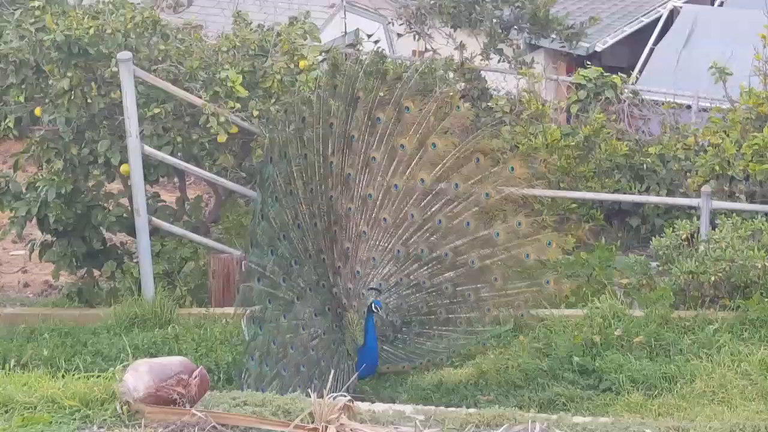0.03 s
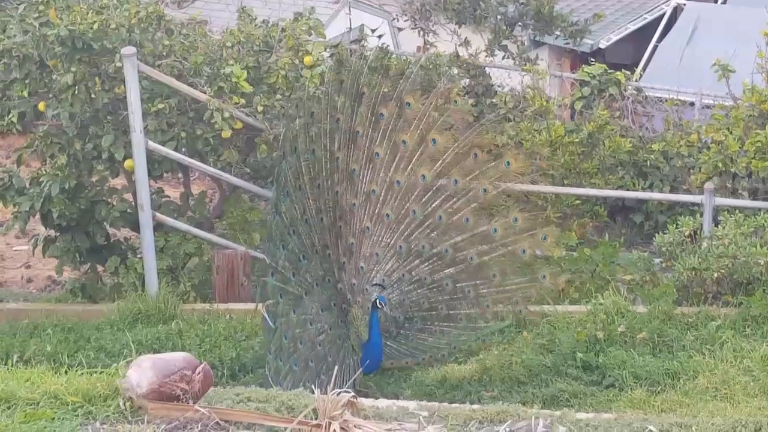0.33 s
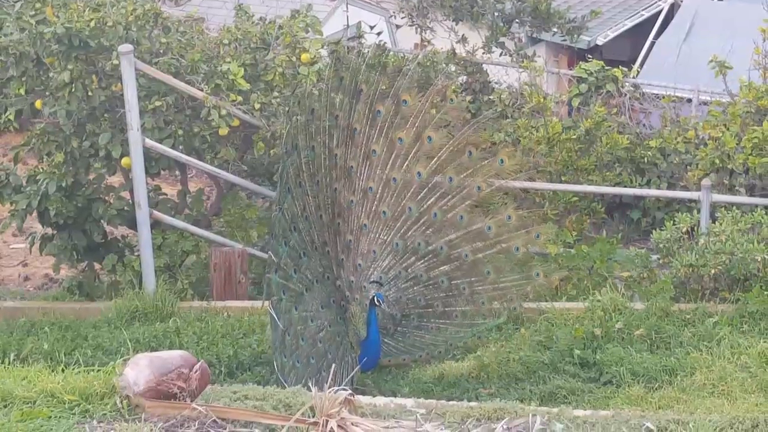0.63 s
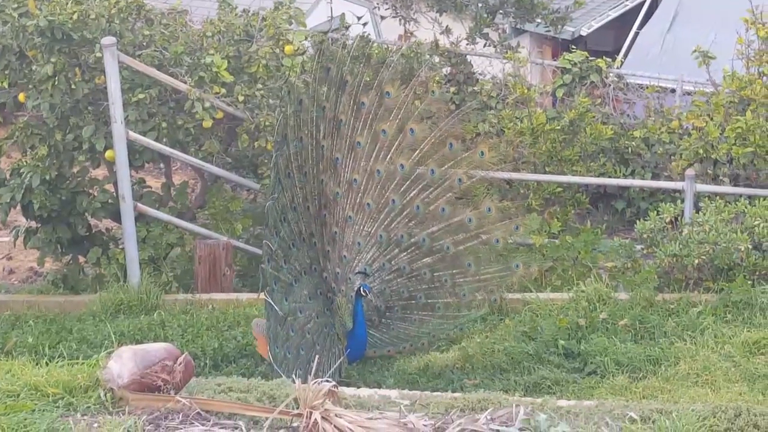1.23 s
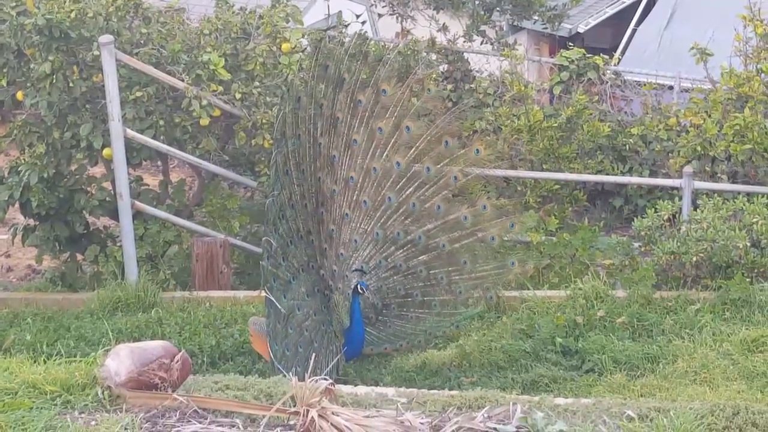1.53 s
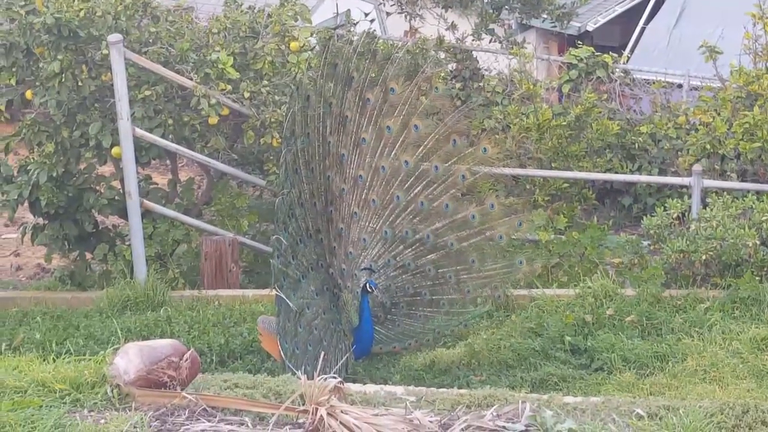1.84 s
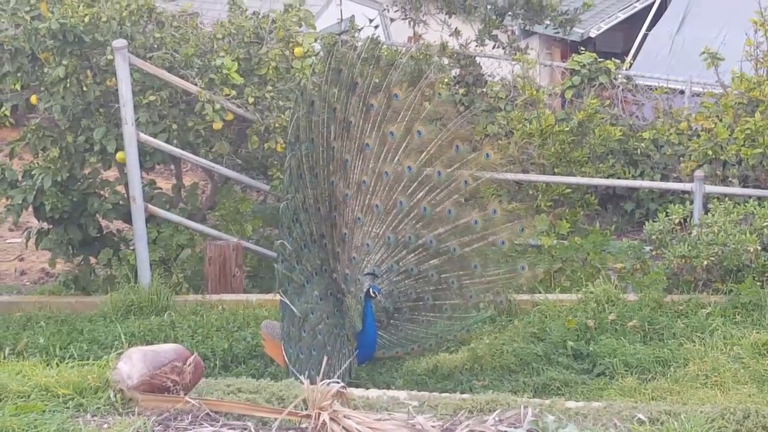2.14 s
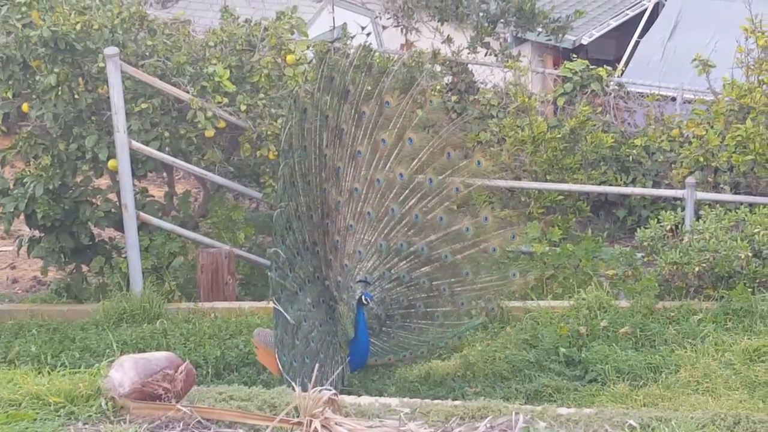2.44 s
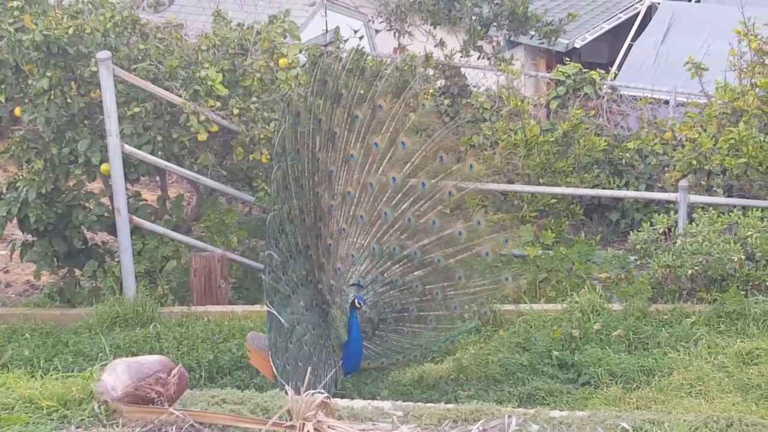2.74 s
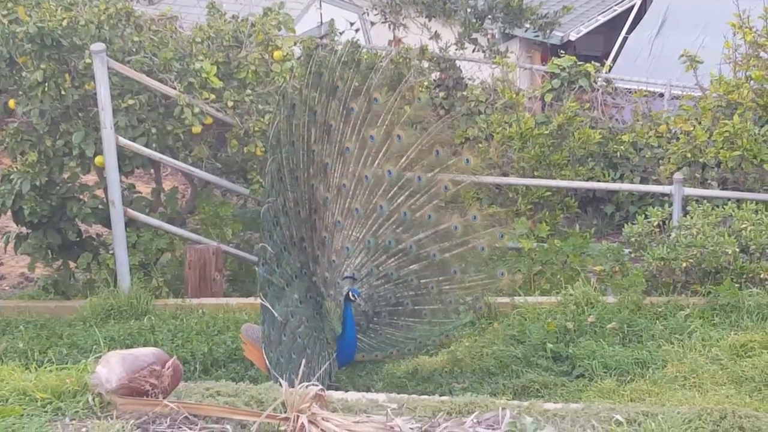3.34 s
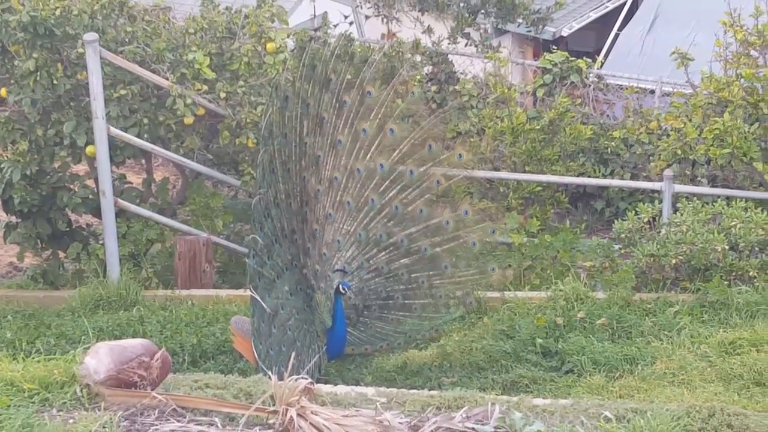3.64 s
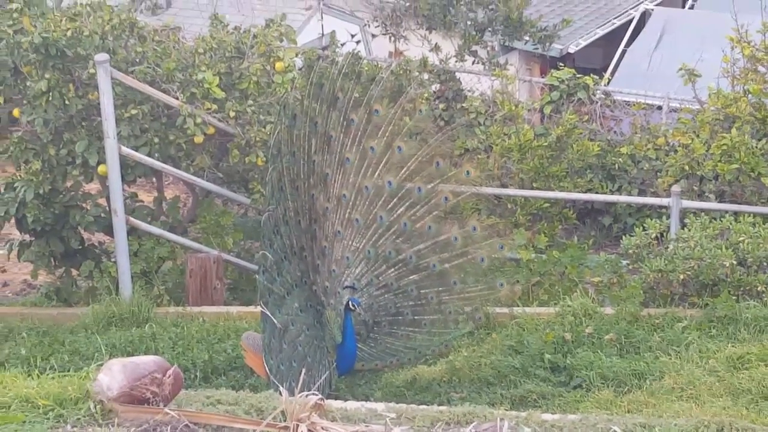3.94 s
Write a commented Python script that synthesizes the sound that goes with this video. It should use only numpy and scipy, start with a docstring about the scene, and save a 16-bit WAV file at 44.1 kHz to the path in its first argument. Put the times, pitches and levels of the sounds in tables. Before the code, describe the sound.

A small songbird chirps over the steady low rumble of distant traffic in a garden.

```python
"""A garden, heard in stereo under the steady low rumble of distant traffic.
A small songbird whistles in the bushes right of the microphone; a second answers from farther off, left.
A displaying peacock rubs and ticks its feathers and scrapes a step through dry grass. Leaves rustle,
a far engine drones, and a faint hiss lies behind it all. The sound fades up in the first second."""
import sys
import numpy as np
from scipy import signal
from scipy.fft import rfft, irfft
from scipy.io import wavfile

SR = 44100
rng = np.random.default_rng(int(sys.argv[2]) if len(sys.argv) > 2 else 0)


def bounce(signal):
    """Save signal as a 16-bit WAV file at the path given by the first command-line argument."""
    frames = np.transpose(np.atleast_2d(signal))
    limited = np.clip(frames, -1, 1)
    pcm = np.round(limited * 32767).astype(np.int16)
    wavfile.write(sys.argv[1], SR, pcm)


N = 176400
T = np.arange(N) / SR
FREQS = np.maximum(np.arange(N // 2 + 1) * SR / N, 1)


def songbirds():
    """Two birds, the nearer on the right and the farther on the left with more of the garden's echo."""
    # the near bird's notes: start_s, length_s, first_hz, middle_hz, last_hz, level_db
    song = [ (.378, .075, 5200, 4530, 3250, -61), (.480, .036, 3300, 2970, 2350, -58.5),
            (.510, .040, 4460, 3900, 3750, -64), (.560, .057, 3650, 3300, 3050, -65),
            (.635, .085, 3150, 3330, 3560, -64), (.660, .054, 4260, 3960, 4180, -58.5),
            (.712, .062, 3600, 3280, 3550, -61), (.803, .056, 4130, 3950, 4080, -57.5),
            (.858, .048, 3730, 3220, 3050, -65.5), (.958, .060, 3230, 3000, 2200, -63.5),
            (1.140, .044, 3150, 2700, 2150, -63), (1.285, .042, 2750, 3150, 3250, -67),
            (1.345, .078, 2320, 3880, 2310, -58.5), (1.522, .046, 3186, 2800, 2300, -64),
            (1.675, .046, 3700, 3050, 2200, -65), (1.818, .042, 2550, 3000, 3250, -67.5),
            (1.900, .072, 2900, 4040, 2700, -59), (2.775, .040, 3050, 3280, 3330, -69)]
    # the far bird's notes, same columns
    answer = [ (3.040, 0.05, 3990, 3830, 3800, -72), (3.210, .065, 3850, 4420, 4200, -76),
              (3.345, .06, 4060, 4000, 3750, -76), (3.480, .04, 4390, 4500, 4480, -78),
              (3.568, 0.034, 3870, 3740, 3840, -67.5), (3.645, 0.081, 4000, 4250, 3620, -71),
              (3.772, 0.067, 3505, 3920, 3220, -69.5), (3.845, 0.0535, 3770, 4120, 4280, -72.5),
              (3.890, .035, 3750, 3450, 3180, -71), (3.920, .082, 4150, 4050, 3390, -72)]
    return (whistles(song, pan_db=-4, right_lag_s=-0.00018, echo_db=-0.5)
            + whistles(answer, pan_db=8, right_lag_s=0.00019, echo_db=2))


def whistles(notes, pan_db, right_lag_s, echo_db):
    """A bird's notes bend through three pitches, clear when held and husky in fast slurs."""
    rasp, slur_rasp_s, edge_s, flutter_db = .016, .0018, .01, 2
    jitter, voice = walk(500), np.zeros(N)
    for start, length, first, middle, last, db in notes:
        on = (T >= start) & (T < start + length)
        progress = (T[on] - start) / length
        hz = np.polyval(np.polyfit([0, .5, 1], [first, middle, last], 2), progress)
        slur_per_s = abs(np.gradient(hz)) * SR / hz
        hz = hz * (1 + (rasp + slur_rasp_s * slur_per_s) * jitter[on])
        edge = np.clip(np.minimum(progress, 1 - progress) * length / edge_s, 0, 1)
        voice[on] += undb(db) * np.sin(np.pi / 2 * edge) * np.sin(2 * np.pi * np.cumsum(hz) / SR)
    voice = voice * undb(flutter_db * walk(150))
    direct = np.array([voice, np.interp(T - right_lag_s, T, voice)])
    return pan(pan_db) * direct + undb(echo_db) * garden_echo(voice)


def peacock():
    """Right of the microphone, feathers swish, the train is shaken and quills tick."""
    # feather swishes: peak_s, rise_s, fall_s, level_db, pan_db
    swishes = [(1.07, .05, 0.04, -75.5, -18.5), (1.365, 0.046, 0.014, -73.5, -11),
               (1.88, .04, 0.052, -77, -8)]
    # shakes of the train, same columns
    shakes = [(2.648, 0.033, 0.029, -60.5, -9), (2.699, .03, .018, -58.5, -1),
              (2.78, 0.051, .025, -73.5, -12)]
    # quill ticks: peak_s, fall_s, level_db, pan_db
    quills = [(1.379, .005, -65, -9), (1.785, .015, -63, -11.5), (1.894, .005, -69, -9),
              (1.965, .005, -66, -6), (2.129, .0089, -61, -5), (2.394, .011, -66.5, -2),
              (2.645, .006, -60, 0), (2.698, 0.0056, -64, -3), (3.772, .004, -66, -6)]
    # spectra of swish, shake and tick: frequency_hz, level_db
    swish_colour = [(2000, -25), (4500, -6), (6200, -17), (7600, -1), (8400, -12), (9500, -21),
                    (15000, -16)]
    shake_colour = [(1500, -1), (3000, 2), (4300, -3), (5000, 5), (6500, 0), (8000, 7), (9700, -14),
                    (12000, -7), (14000, -3), (15500, -1.5)]
    quill_colour = [(1500, -8), (3500, 1), (5200, 4.5), (6500, -5), (8000, 7), (9200, -17), (11500, -11),
                    (15000, -7)]
    tick_rise_s = 0.0016
    ticks = [(peak, tick_rise_s, fall, db, pan_db) for peak, fall, db, pan_db in quills]
    return friction(swishes, swish_colour) + friction(shakes, shake_colour) + friction(ticks, quill_colour)


def grass_step():
    """A step scrapes through dry grass on the right."""
    # scrapes: peak_s, rise_s, fall_s, level_db, pan_db
    scrapes = [(2.056, 0.013, 0.031, -64, -5), (2.23, 0.12, 0.035, -76, -7)]
    # spectrum of dry grass: frequency_hz, level_db
    scrape_colour = [(3500, -9), (4900, -7.5), (5800, -15)]
    return friction(scrapes, scrape_colour)


def bushes():
    """Leaves rub together in two soft, centred swells."""
    # rustles: peak_s, rise_s, fall_s, level_db, pan_db
    rustles = [(1.4, 0.57, 0.62, -72, 0), (3.87, 0.091, 0.48, -66.5, 0)]
    # spectrum of the leaves: frequency_hz, level_db
    rustle_colour = [(1500, -3), (2300, 5.5), (3200, -1.5), (4800, -4.5), (6200, -14), (8000, -7),
                     (9200, -8), (11000, -20)]
    return friction(rustles, rustle_colour)


def friction(strokes, spectrum):
    """Grainy rubbing of feathers, leaves or grass; each stroke swells to a peak and dies away."""
    grain_db, echo_db = 2.5, -2.5
    envelope = 0
    for peak, rise, fall, db, pan_db in strokes:
        swell = np.exp(np.minimum((T - peak) / rise, (peak - T) / fall))
        envelope = envelope + pan(pan_db) * undb(db) * swell
    grain = unit(undb(grain_db * walk(180)))
    rub = envelope * grain * np.array([noise(colour(spectrum)) for _ in range(2)])
    return rub + undb(echo_db) * garden_echo(rub.mean(axis=0))


def traffic():
    """Far road noise: each octave band flickers a little; the bass is alike in both channels."""
    # rumble common to both channels: frequency_hz, level_db
    mid_colour = [(18, -29), (31, -20.5), (40, -5), (54, -5), (70, -2.5), (88, -1.5), (115, -1.5),
                  (150, -6.5), (178, -6), (196, -8.5), (228, -9), (310, -13), (420, -22), (720, -20),
                  (1060, -28), (1500, -31), (2500, -39.5)]
    # rumble that differs between them, same columns
    side_colour = [(15, -45), (25, -11.5), (69, -6), (87, 5), (161, -4.5), (200, 0), (489, -7),
                   (1020, -5.5), (1480, -8), (2600, -19), (3380, -43), (5720, -120)]
    # the road's left-right balance: frequency_hz, pan_db
    balance = [(60, 1.0), (250, 0.8), (600, -1), (1300, -1.5), (2300, -4)]
    mid = undb(-43.8) * noise(colour(mid_colour))
    side = undb(-58.1) * noise(colour(side_colour))
    hz, db = np.array(balance).T
    pan_db = np.interp(np.log(FREQS), np.log(hz), db)
    spectrum = rfft(np.array([mid + side, mid - side])) * pan(pan_db)
    flicker_db, rumble = 0.74, 0
    for octave in range(3, 15):
        band = np.maximum(1 - abs(np.log2(FREQS) - octave), 0)
        rumble = rumble + irfft(spectrum * band, N) * undb(flicker_db * walk(6.8))
    return rumble


def engine_drone():
    """A far engine's unsteady firing note swells within the rumble."""
    # the engine's swells: time_s, level_db
    swells = [(.6, -62), (1.2, -50), (2.0, -54.5), (2.5, -45), (3.4, -54), (3.9, -79)]
    firing_hz, wander_hz, waver_db = 82.7, 4.42, 2
    hz = firing_hz + wander_hz * walk(7.96)
    return np.sin(2 * np.pi * np.cumsum(hz) / SR) * undb(curve(swells) + waver_db * walk(8.9))


def hiss():
    """Smooth faint hiss, unrelated between the channels."""
    # spectrum of the hiss: frequency_hz, level_db
    hiss_colour = [(1800, -9.5), (2700, 2.5), (4000, 0.5), (5200, -3.5), (6400, -7), (7800, -6.5),
                   (9000, -12), (10500, -12), (13000, -6), (15500, -6)]
    return undb(-69) * np.array([noise(colour(hiss_colour)) for _ in range(2)])


def garden_echo(x):
    """Quick scatter from nearby bushes and a longer tail from fences and house walls, in stereo."""
    scatter_t60_s, tail_t60_s, tail_db = 0.066, 0.99, -9
    t = T[:SR]
    decay = undb(-60 * t / scatter_t60_s) + undb(tail_db - 60 * t / tail_t60_s)
    response = rng.standard_normal((2, SR)) * decay
    response /= np.sqrt(np.sum(response ** 2, axis=1, keepdims=True))
    return signal.fftconvolve(x[None], response, axes=1)[:, :N]


def undb(db):
    """Decibels to gain."""
    return 10 ** (np.asarray(db) / 20)


def unit(x):
    """Scale to rms 1."""
    return x / np.sqrt(np.mean(x ** 2))


def curve(rows):
    """Rows of time_s, value joined by straight lines."""
    return np.interp(T, *np.array(rows).T)


def colour(rows):
    """Gain at every frequency from rows of frequency_hz, level_db, falling steeply beyond the ends."""
    hz, db = np.array(rows).T
    skirts = np.minimum(FREQS / hz[0], 1) * np.minimum(hz[-1] / FREQS, 1)
    return undb(np.interp(np.log(FREQS), np.log(hz), db)) * skirts ** 6


def noise(gain):
    """Noise of rms 1 with the given spectral shape."""
    return unit(irfft(rfft(rng.standard_normal(N)) * gain, N))


def walk(rate_hz):
    """Smooth random wander of rms 1, moving about rate_hz times a second."""
    return noise(1 / (1 + (FREQS / rate_hz) ** 4))


def pan(pan_db):
    """Left and right gains; pan_db is the left level minus the right."""
    return undb(np.array([[.5], [-.5]]) * pan_db)


def scene():
    """The garden as it reaches the microphone."""
    return songbirds() + peacock() + grass_step() + traffic() + engine_drone() + hiss() + bushes()


def record(dry):
    """The recorder fades in and cuts the top."""
    # the opening fade: time_s, gain_db
    fade_in = [(.364, -65), (.376, -31), (.42, -16.5), (.52, -9.5), (.66, -2.5), (.8, -3)]
    top_hz = 15750
    lowpass = signal.ellip(10, .2, 70, top_hz, fs=SR, output="sos")
    return signal.sosfilt(lowpass, dry * undb(curve(fade_in)))


dry = scene()
out = record(dry)
bounce(out)
```